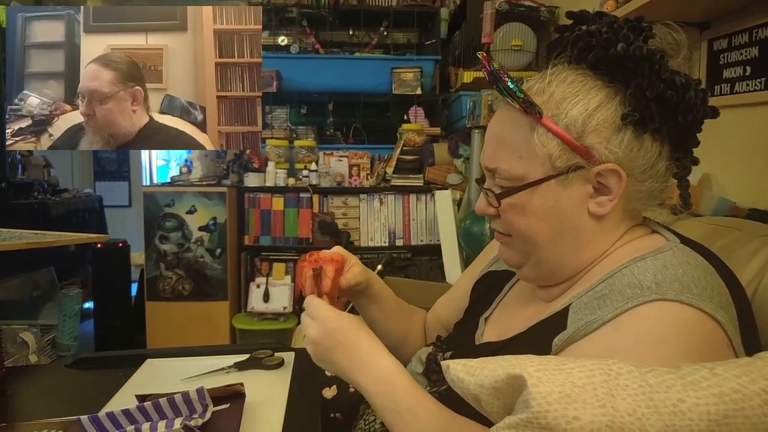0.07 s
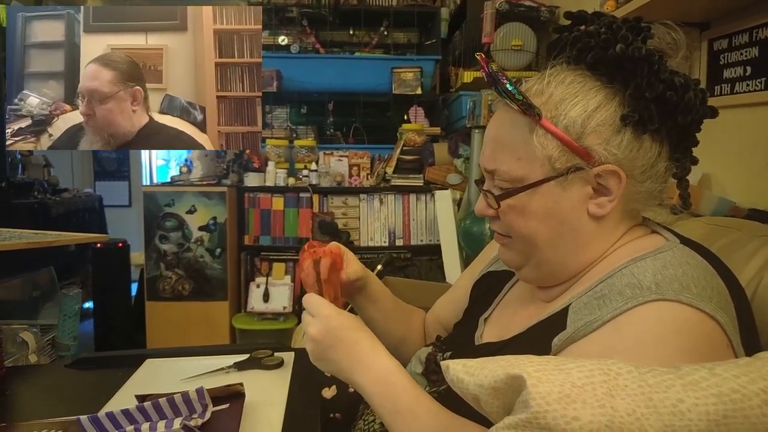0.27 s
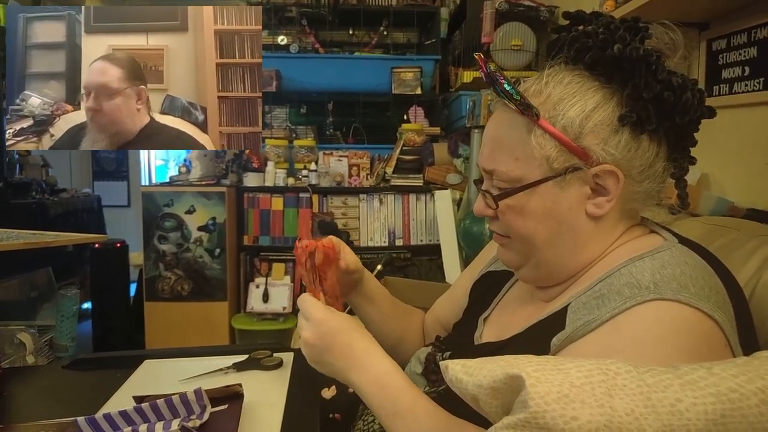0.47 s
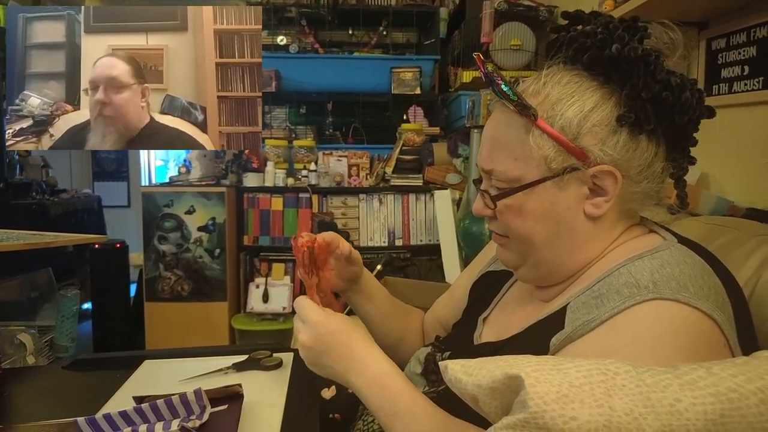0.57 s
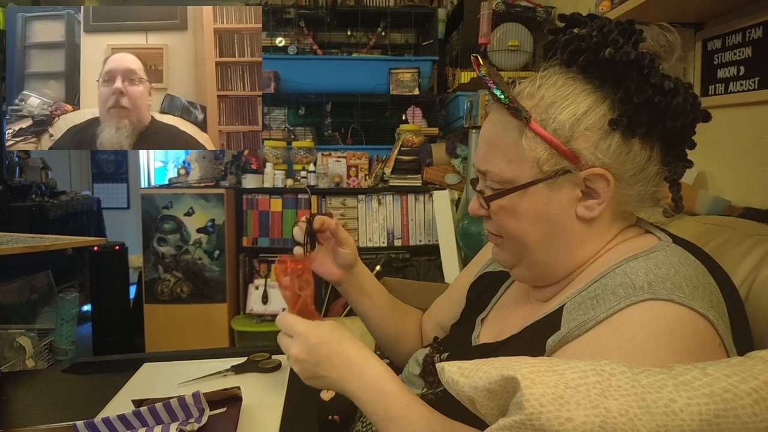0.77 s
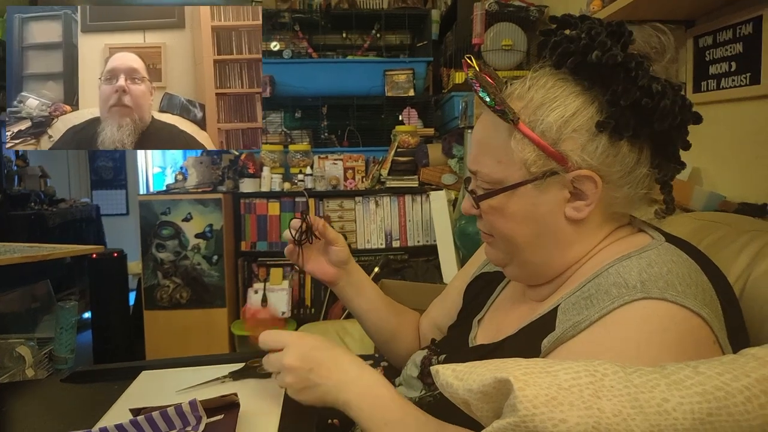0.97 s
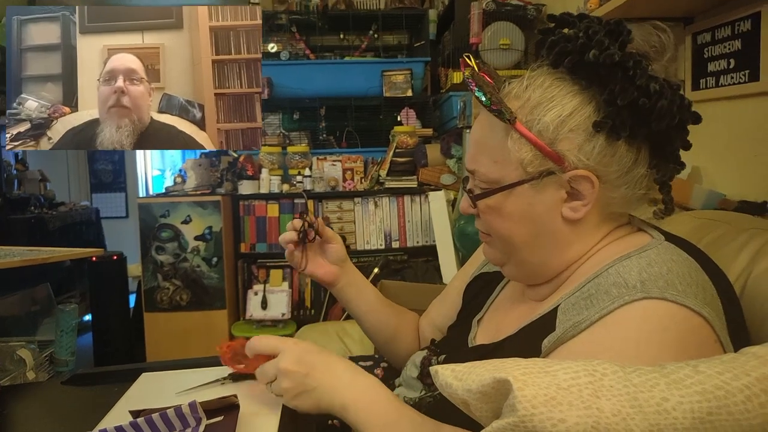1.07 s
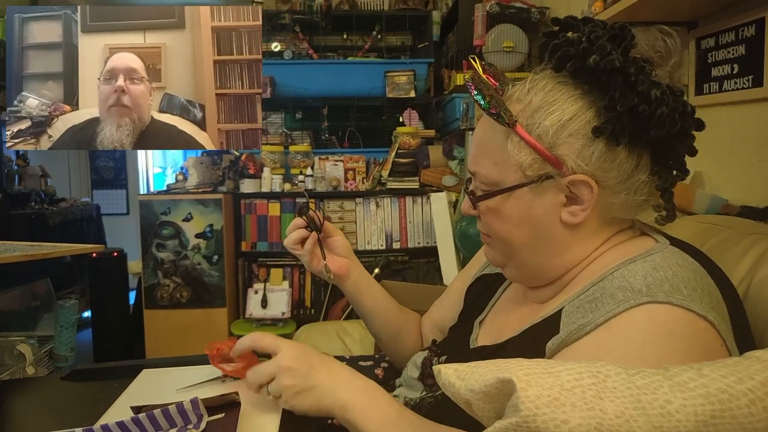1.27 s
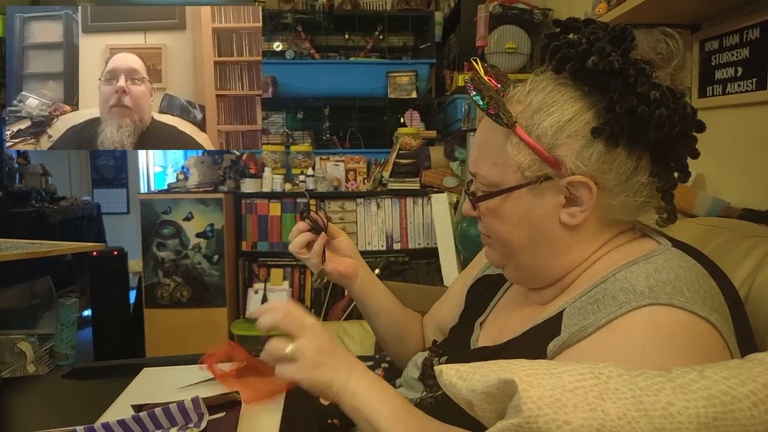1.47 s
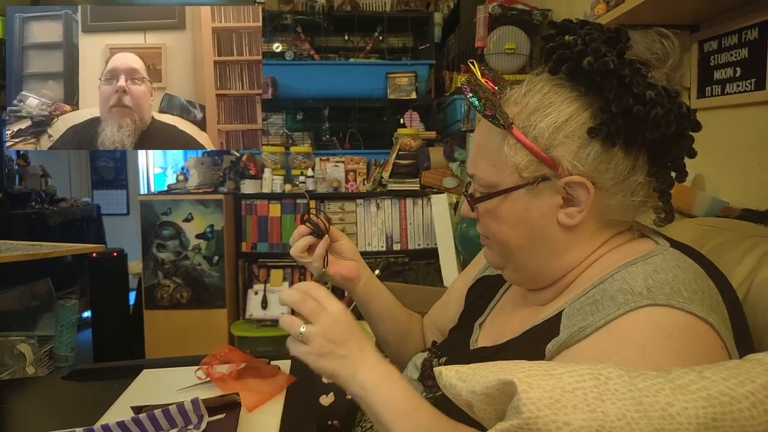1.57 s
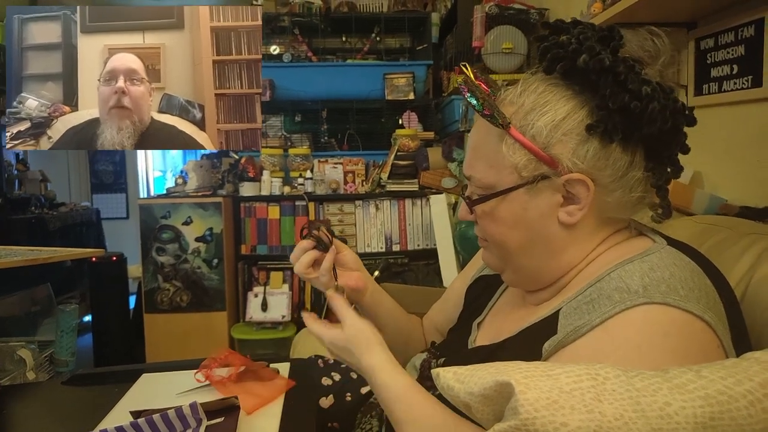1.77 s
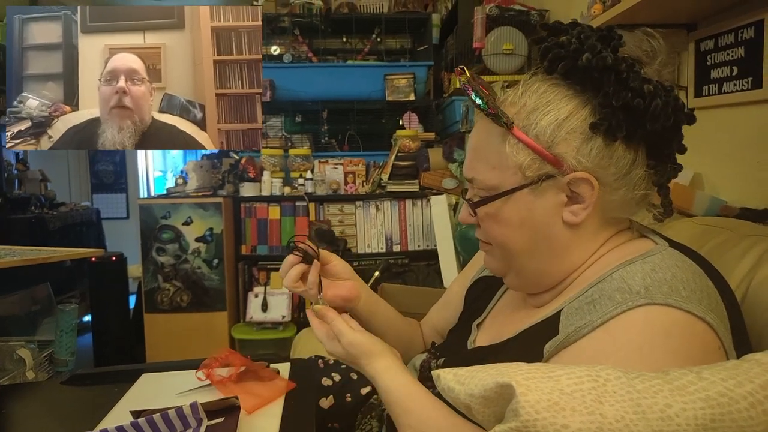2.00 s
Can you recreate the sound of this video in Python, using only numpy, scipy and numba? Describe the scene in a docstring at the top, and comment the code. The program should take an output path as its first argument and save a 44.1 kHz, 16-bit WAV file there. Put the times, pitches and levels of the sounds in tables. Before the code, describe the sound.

Muffled clothing thumps and rubbing hit a close clip-on microphone, mainly left. Rapid runs are strongest around 0.2-0.4 seconds, continue at 0.6 and 0.8-1.15, and return near 1.3. A softer right bump comes near 1.0. After 1.4 it is sparser, with a faint bright tick at 1.74, a duller clack at 1.86 and light thumps near 1.9. Room hiss and very faint mesh crackle lie beneath.

```python
"""Clothing sticks and slips against the left of two clip-on microphones in runs of dull thumps, as arms
handle a small organza bag; the right one gets a few softer bumps. Slips are short wave packets with a mount
ring, over denser muffled rubbing. A trinket's clicks are cracks plus decaying modes with a room tail.
Behind lie filtered-noise room hiss and sparse-impulse organza crackle; a gain control ducks it all a little."""
import sys
import numpy as np
from scipy import signal
from scipy.fft import rfft, irfft
from scipy.io import wavfile
from scipy.ndimage import uniform_filter1d, minimum_filter1d
from numba import njit

SR = 44100
rng = np.random.default_rng(int(sys.argv[2]) if len(sys.argv) > 2 else 0)


def pcm_store(signal):
    """Save signal as 16-bit PCM."""
    levels = np.round(np.clip(np.atleast_2d(signal), -1, 1) * 32767)
    wavfile.write(sys.argv[1], SR, levels.astype(np.int16).T)


N = 89787

# Cloth slips, left microphone: [t/s, relative level/dB, f/Hz]
LEFT_SLIPS = [(0.051, -9.5, 245), (0.062, -10, 266), (0.071, 0.6, 222.6), (0.079, -8, 196),
              (0.164, -14.5, 228.3), (0.201, -7, 192), (0.222, -1.5, 231), (0.24, -2, 188),
              (0.275, -1.3, 234), (0.282, -0.7, 263), (0.29, -4.5, 267), (0.298, -7, 235), (0.307, 3, 304),
              (0.317, -6.5, 292.7), (0.343, 1.8, 280), (0.354, -5, 247), (0.36, -2, 264), (0.369, -5, 285),
              (0.383, -6.5, 218), (0.434, -10.5, 218), (0.443, -12, 246), (0.469, -7.5, 173),
              (0.484, -6.5, 180), (0.502, -10, 187), (0.515, -11, 169), (0.619, -5.5, 226),
              (0.634, -7, 245), (0.643, -6.5, 203), (0.655, -7, 182.4), (0.799, 1, 233), (0.832, -11, 285),
              (0.841, -4.9, 200), (0.874, -12.5, 203), (0.905, -4, 227), (0.923, -4.4, 265),
              (0.938, -4, 240), (0.958, -3.5, 241), (0.965, -3.5, 281), (0.985, -6.5, 253),
              (1.018, -7.5, 226), (1.028, -9, 227), (1.052, -9.5, 198.7), (1.074, -12, 208),
              (1.081, -5.5, 237.6), (1.096, -2, 214), (1.108, -1.9, 222), (1.122, -13, 212),
              (1.151, -10.5, 166), (1.159, -11.5, 177), (1.25, -10.0, 197), (1.283, -8.5, 166),
              (1.307, -6, 241), (1.316, -1.5, 208), (1.327, -3.3, 287.3), (1.344, -7, 213),
              (1.351, -10, 187), (1.524, -9.5, 256), (1.608, -14.5, 285), (1.655, -17, 213),
              (1.688, -12, 244), (1.853, -13, 209), (1.862, -13.5, 237.6), (1.897, -7.5, 253),
              (1.915, -8, 229), (1.926, -5.5, 191.7), (1.937, -10.5, 210), (1.95, -14.5, 194),
              (1.971, -8.5, 225.6), (2.008, -16.5, 170)]
# Cloth bumps, right microphone: [t/s, relative level/dB, f/Hz]
RIGHT_BUMPS = [(.1375, -26.5, 147), (.495, -20.5, 142), (.9754, -9, 163), (1.2682, -18, 163),
               (1.3512, -15.5, 165), (1.363, -15, 139)]
SLIP_GAIN_DB, BUMP_GAIN_DB = 1, -1.5
SLIP_SIGMA_CYCLES = 0.45
# Edge of the hardest slips; growth is extra dB per dB of slip level below 0
SNAP_HZ, SNAP_DB, SNAP_GROWTH = 492, -19.5, 1
# Ring of the microphone's clip and cable: [nominal f/Hz, level/dB, t60/s]
MOUNT_MODES = [(171.3, -27, 0.037), (233, -45.5, 0.088), (370, -18, 0.026)]

# Cloth rubbing effort, left: [t/s, level/dB]
LEFT_EFFORT = [(0, -37), (.06, -11), (.125, -30), (.16, -22), (.19, -32), (.255, -24.5), (.29, -14.5),
               (.37, -12.5), (.41, -21.5), (.45, -21.5), (.5, -22.5), (.55, -34), (.6, -30), (.65, -13),
               (.685, -40), (.78, -40.5), (.82, -24.5), (.97, -23.5), (1.12, -20.5), (1.2, -27.5),
               (1.25, -26), (1.34, -20), (1.38, -30.5), (1.49, -30), (1.6, -25.5), (1.76, -31.5),
               (1.83, -28), (1.92, -21.5), (2.0, -22.5), (2.036, -47)]
# Cloth rubbing effort, right: [t/s, level/dB]
RIGHT_EFFORT = [(0, -52.5), (.08, -47.5), (.14, -30), (.2, -50.5), (.37, -53), (.44, -33.5), (.55, -45),
                (.7, -36.5), (.76, -59), (.92, -47), (.97, -31), (1.05, -32.5), (1.17, -57), (1.33, -34),
                (1.42, -36), (1.52, -50), (1.66, -53), (1.8, -55), (1.96, -48)]
RUB_MEDIAN_GAP_S, RUB_SCATTER_DB, RUB_SPREAD_OCTAVES = 1 / 260, 4.5, 0.57
RUB_LEFT_HZ, RUB_RIGHT_HZ, RUB_LEFT_GAIN_DB, RUB_RIGHT_GAIN_DB = 181.4, 147, 0.5, -0.5
RUB_REF_DB, RUB_OCTAVES_PER_DB = -29.5, 0.0679  # harder rubbing is brighter
CLOTH_CUT_RATIO = 1.56  # muffling cutoff / nominal pitch
TUG_HZ, TUG_LEFT_GAIN_DB, TUG_RIGHT_GAIN_DB = 74.7, -9.5, -3  # tugs on the cable

# Trinket's bright tick: [t/s, level/dB]
TICK_HITS = [(1.741, -30.5)]
# Tick modes: [f/Hz, level/dB, t60/s]
TICK_MODES = [(3780, -9, .03), (3800, -9, 0.03), (4060, -2.5, 0.017), (4380, -12, .05), (5270, -10, 0.017)]
# Trinket's duller clacks: [t/s, level/dB]
CLACK_HITS = [(1.857, -31), (1.977, -42.5), (2.007, -40.5)]
# Clack modes: [f/Hz, level/dB, t60/s]
CLACK_MODES = [(1320, -8, 0.033), (1393, 1.5, 0.037), (1724, -4.5, 0.038), (2190, -9, .025),
               (2464, -4, 0.044), (3730, -18, .03)]
TICK_RIGHT_DB, CLACK_RIGHT_DB = -12, -4.5  # relative to left
CRACK_DECAY_S, CRACK_DB = 0.00115, 3
CONTACT_RAMP_S = 0.00072  # fingers soften the contacts
ROOM_T60_S, ROOM_DB = 0.15, -5

# Organza crackle spectrum: [f/Hz, relative level/dB per Hz]
ORGANZA_SPECTRUM = [(500, -34), (1400, -11), (2600, 10), (4000, -5), (6200, -12.5), (9000, -14),
                    (15000, -44.5)]
ORGANZA_DB, ORGANZA_PER_S, ORGANZA_RIGHT_DB = -58, 300, -15

# Room hiss spectra: [f/Hz, left relative level/dB per Hz, right relative level/dB per Hz]
HISS_SPECTRA = [(20, -17.5, 0), (59.7, 3.5, 5), (154, 17.5, 3), (363, 6.5, 2), (726, -1, -1),
                (1130, -5, -6.5), (1560, -3.5, -8), (2070, -8.5, -5.5), (2361, -6, -6.5),
                (3390, -14.5, -14.5), (4430, -14.5, -20.5), (5030, -17, -21), (6100, -14.5, -22),
                (7390, -20.5, -36.5), (8800, -29, -30), (10334, -30.5, -32), (12700, -42.5, -44),
                (15500, -44.5, -42.5)]
HISS_LEFT_DB, HISS_RIGHT_DB, HISS_FLICKER_DB = -35.5, -41, -0.5

AGC_KNEE, AGC_SLOPE, AGC_ATTACK_S, AGC_RELEASE_S = 0.42, 0.59, 0.008, 0.21
LIMIT_PEAK, TOP_HZ = 0.91, 15700


def undb(db):
    """Decibels to amplitude gain."""
    return 10 ** (np.asarray(db) / 20)


def unit(x):
    """Scale to rms 1."""
    return x / np.sqrt(np.mean(x ** 2) + 1e-18)


def add(out, at_s, sound):
    """Mix a sound in at a given time, trimmed to the scene."""
    start = int(round(at_s * SR))
    lo, hi = max(start, 0), min(start + len(sound), N)
    if hi > lo:
        out[lo:hi] += sound[lo - start:hi - start]


def colour(x, hz, db):
    """Filter by a spectrum interpolated on a log-frequency axis."""
    f = np.maximum(np.arange(N // 2 + 1) * SR / N, 1)
    gain = undb(np.interp(np.log(f), np.log(hz), db))
    return irfft(rfft(x) * gain, N)


def walk(rate_hz):
    """Smooth random wander, trimmed to the scene and scaled to rms 1."""
    k = int(SR / rate_hz)
    steps = np.repeat(rng.standard_normal(N // k + 1), k)
    return unit(uniform_filter1d(steps, k)[:N])


def shake(t, hz):
    """Capsule displaced to and fro: Gaussian wave packet centred on t = 0."""
    return -np.cos(2 * np.pi * hz * t) * np.exp(-0.5 * (hz * t / SLIP_SIGMA_CYCLES) ** 2)


def ring(modes, t, stretch=1):
    """Exponentially decaying modes struck at t = 0; stretch scales their frequencies."""
    t = np.maximum(t, 0)
    return sum(undb(db) * np.sin(2 * np.pi * hz * stretch * t) * np.exp(-np.log(1000) * t / t60)
               for hz, db, t60 in modes)


def thumps(rows, snap_db=-60):
    """Each slip shakes the capsule about two cycles, hard ones with more snap; the mount rings after."""
    out = np.zeros(N)
    lead_s = 1 / 20
    t = np.arange(SR // 8) / SR - lead_s
    detunes = rng.standard_normal(len(rows))
    for (at_s, db, hz), detune in zip(rows, detunes):
        snap = undb(snap_db + min(db, 0) * SNAP_GROWTH) * shake(t, SNAP_HZ)
        mount = ring(MOUNT_MODES, t, np.exp(0.15 * detune))
        add(out, at_s - lead_s, undb(db) * (shake(t, hz) + snap + mount))
    return out


def rubbing(effort, hz, count=900):
    """Dense small slips, muffled by the cloth, louder and brighter with the effort of the arms."""
    effort_s, effort_db = np.array(effort).T
    gap, size, pitch = rng.standard_normal((count, 3)).T
    times_s = np.cumsum(np.exp(0.6 * gap)) * RUB_MEDIAN_GAP_S
    brightness = RUB_OCTAVES_PER_DB * (np.interp(times_s, effort_s, effort_db) - RUB_REF_DB)
    octaves = RUB_SPREAD_OCTAVES * np.tanh(pitch) + brightness
    rows = np.column_stack([times_s, RUB_SCATTER_DB * size, hz * 2 ** octaves])
    cloth = signal.butter(3, [36, hz * CLOTH_CUT_RATIO], "band", fs=SR, output="sos")
    slips = signal.sosfilt(cloth, thumps(rows[times_s < N / SR]))
    # level out over 1300 samples, then impose the effort curve
    power = np.abs(uniform_filter1d(slips ** 2, size=1300))
    steady = slips / np.sqrt(power + 1e-6)
    return steady * undb(np.interp(np.arange(N) / SR, effort_s, effort_db))


def clicks(rows, modes, right_db):
    """Trinket contacts: a short noise crack and ringing modes, with a diffuse tail from the room."""
    out = np.zeros((2, N))
    t = np.arange(SR // 4) / SR
    hz = np.array(modes)[:, 0]
    band = signal.butter(2, [hz.min() * 0.3, hz.max()], "band", fs=SR, output="sos")
    for at_s, db in rows:
        for side, side_db in zip(out, (0, right_db)):
            crack, tail = rng.standard_normal((2, len(t)))
            crack = signal.sosfilt(band, crack) * np.exp(-t / CRACK_DECAY_S)
            hit = ring(modes, t) + undb(CRACK_DB) * crack
            hit = hit * np.minimum(t / CONTACT_RAMP_S, 1)
            tail = tail * undb(-60 * t / ROOM_T60_S)
            wet = signal.fftconvolve(hit, tail / np.linalg.norm(tail))[:len(t)]
            add(side, at_s, undb(db + side_db) * (hit + undb(ROOM_DB) * wet))
    return out


def organza():
    """Stiff mesh crackle: sparse random impulses, coloured; right is fainter and 5 ms later."""
    when, size = rng.random(N), rng.standard_normal(N)
    impulses = (when < ORGANZA_PER_S / SR) * size
    crackle = unit(colour(impulses, *np.array(ORGANZA_SPECTRUM).T)) * undb(ORGANZA_DB)
    return np.array([crackle, undb(ORGANZA_RIGHT_DB) * np.roll(crackle, SR // 200)])


def room():
    """Coloured hiss, independent at the two microphones, its level wandering slightly."""
    hz, left, right = np.array(HISS_SPECTRA).T
    sides = []
    for shape, db in ((left, HISS_LEFT_DB), (right, HISS_RIGHT_DB)):
        hiss = unit(colour(rng.standard_normal(N), hz, shape))
        sides.append(hiss * undb(db + HISS_FLICKER_DB * walk(23)))
    return np.array(sides)


@njit
def follow(x, attack, release):
    """One-pole level follower, quick up and slow down, from a quarter of the peak."""
    out, level = np.empty(len(x)), x.max() / 4
    for i in range(len(x)):
        level += (x[i] - level) * (attack if x[i] > level else release)
        out[i] = level
    return out


def scene():
    """Cloth on each microphone, the trinket, the bag and the room."""
    air = room() + organza()
    trinket = (clicks(TICK_HITS, TICK_MODES, TICK_RIGHT_DB)
               + clicks(CLACK_HITS, CLACK_MODES, CLACK_RIGHT_DB))
    left = undb(SLIP_GAIN_DB) * thumps(LEFT_SLIPS, snap_db=SNAP_DB)
    left += undb(RUB_LEFT_GAIN_DB) * rubbing(LEFT_EFFORT, RUB_LEFT_HZ)
    left += undb(TUG_LEFT_GAIN_DB) * rubbing(LEFT_EFFORT, TUG_HZ)
    right = undb(BUMP_GAIN_DB) * thumps(RIGHT_BUMPS)
    right += undb(RUB_RIGHT_GAIN_DB) * rubbing(RIGHT_EFFORT, RUB_RIGHT_HZ)
    right += undb(TUG_RIGHT_GAIN_DB) * rubbing(RIGHT_EFFORT, TUG_HZ)
    return np.array([left, right]) + trinket + air


def record(dry):
    """Shared gain control ducks after loud thumps, a limiter catches peaks, a low-pass cuts the top."""
    loudest = np.abs(dry).max(axis=0)
    level = follow(loudest, 1 / (AGC_ATTACK_S * SR), 1 / (AGC_RELEASE_S * SR))
    gain = (0.5 + (level / AGC_KNEE) ** 2) ** (-AGC_SLOPE / 2)
    headroom = 1 / np.maximum(np.abs(dry * gain).max(axis=0) / LIMIT_PEAK, 1)
    gain = gain * uniform_filter1d(minimum_filter1d(headroom, size=441), size=441)
    low_pass = signal.ellip(8, 0.2, 70, TOP_HZ, fs=SR, output="sos")
    return signal.sosfilt(low_pass, dry * gain)


dry = scene()
out = record(dry)
pcm_store(out)
```